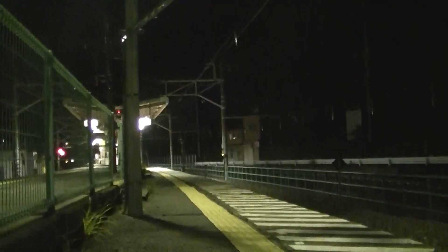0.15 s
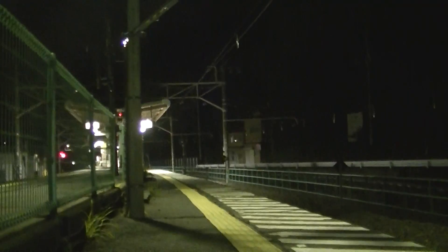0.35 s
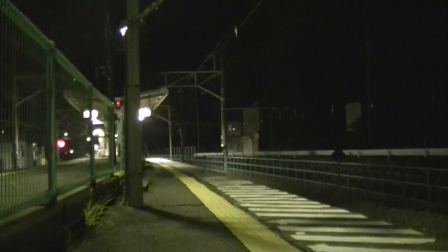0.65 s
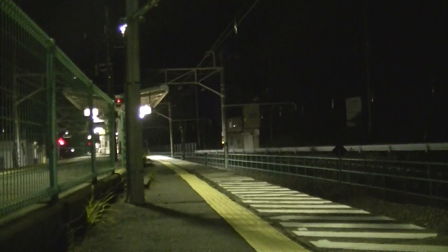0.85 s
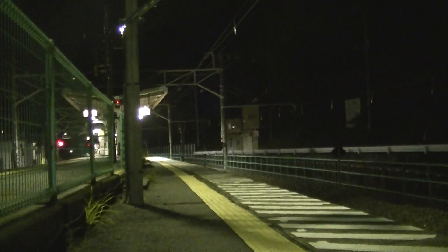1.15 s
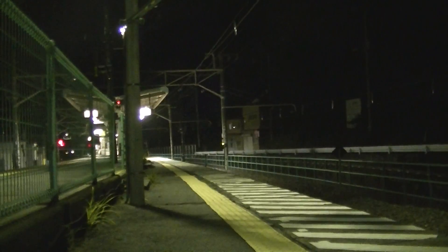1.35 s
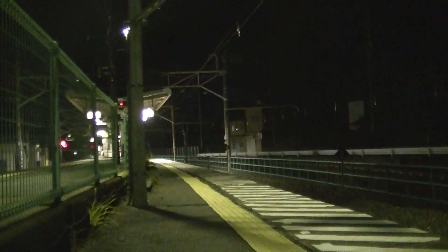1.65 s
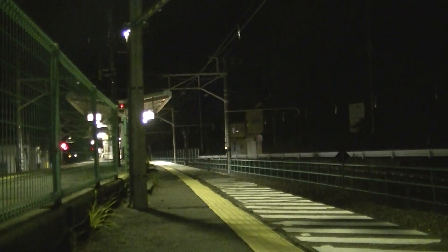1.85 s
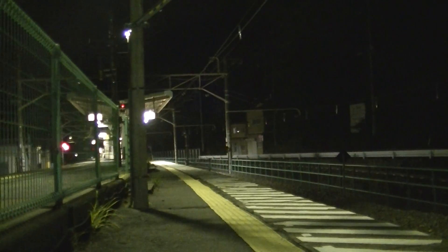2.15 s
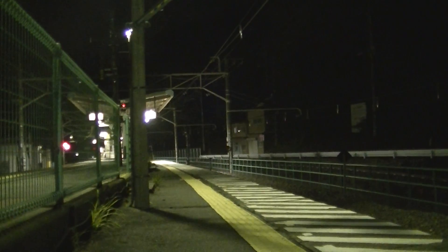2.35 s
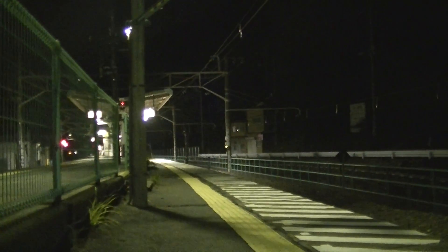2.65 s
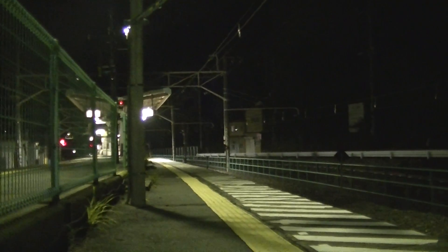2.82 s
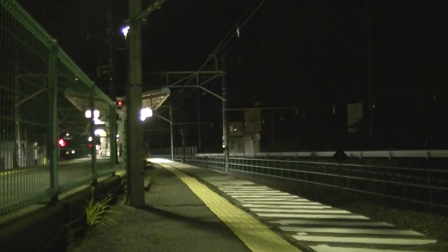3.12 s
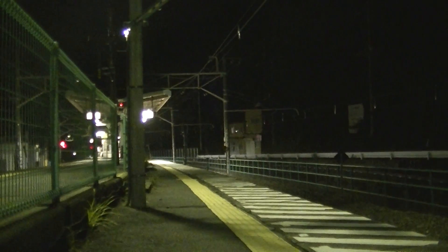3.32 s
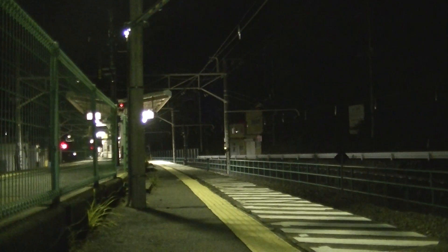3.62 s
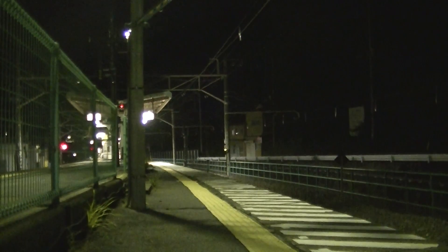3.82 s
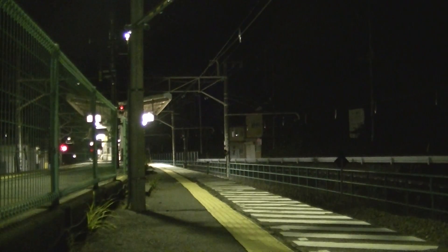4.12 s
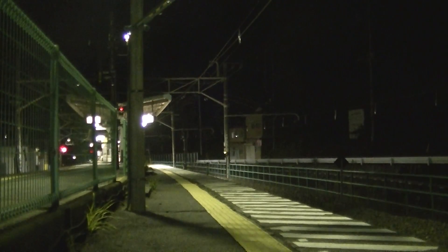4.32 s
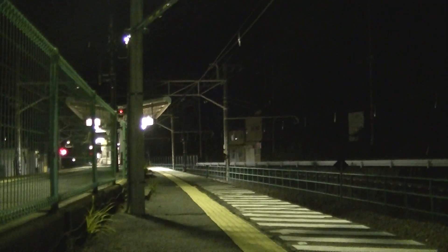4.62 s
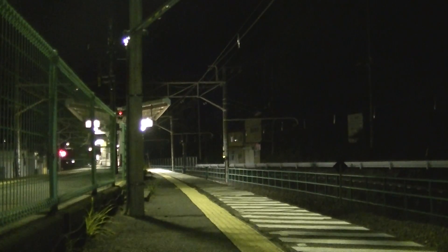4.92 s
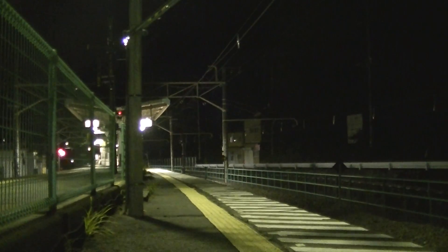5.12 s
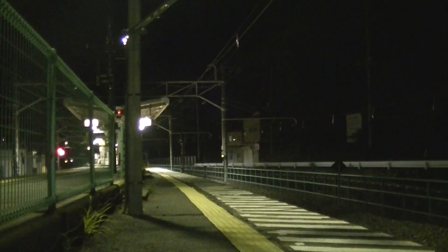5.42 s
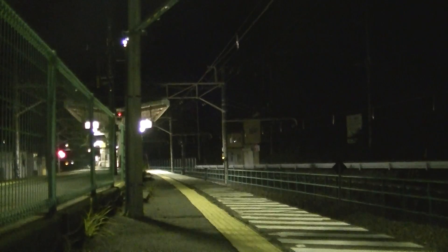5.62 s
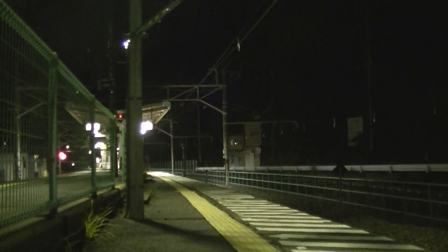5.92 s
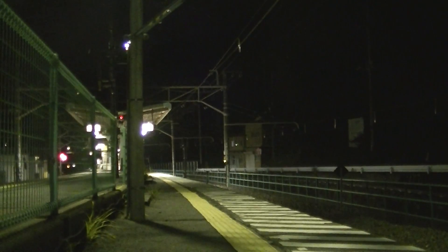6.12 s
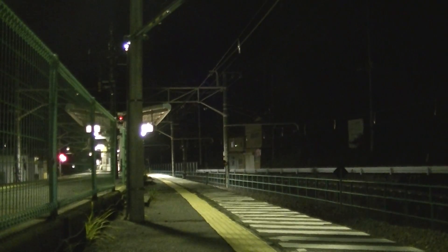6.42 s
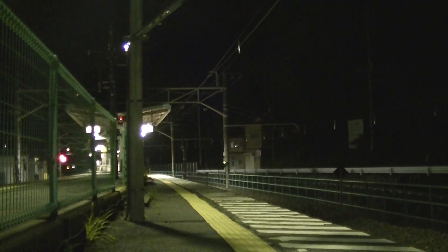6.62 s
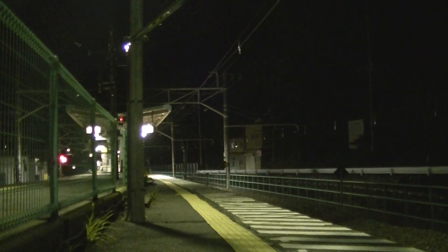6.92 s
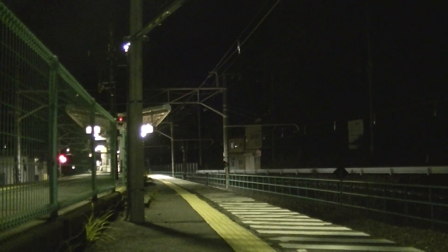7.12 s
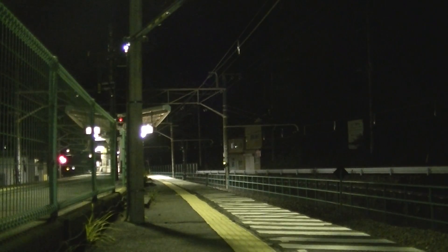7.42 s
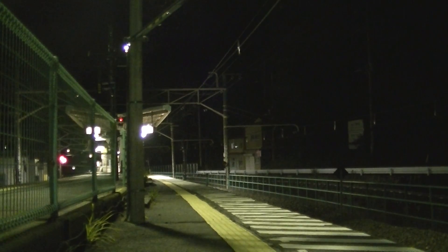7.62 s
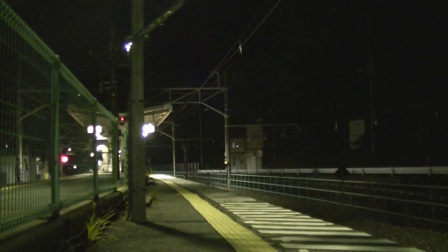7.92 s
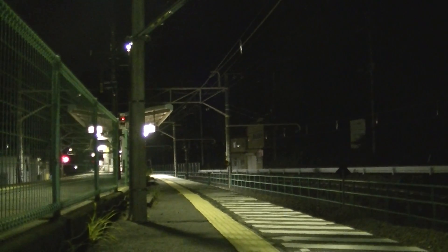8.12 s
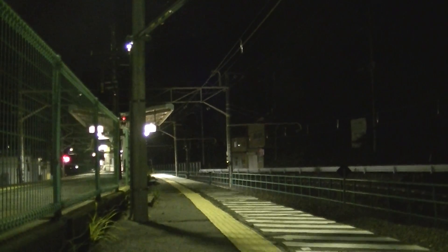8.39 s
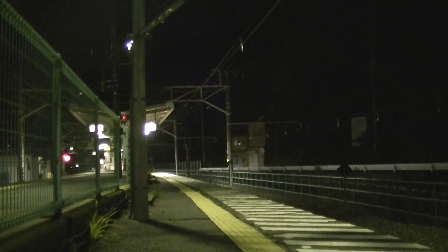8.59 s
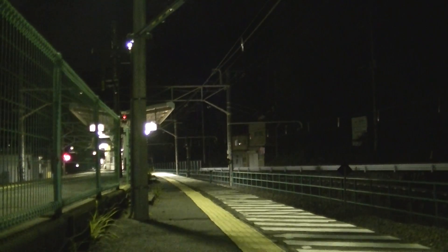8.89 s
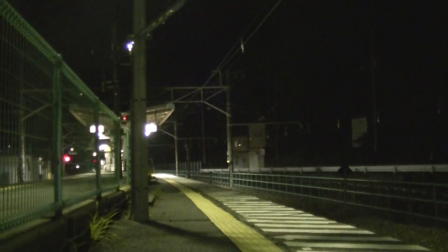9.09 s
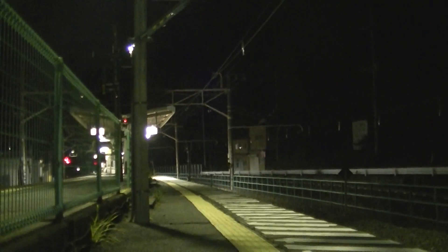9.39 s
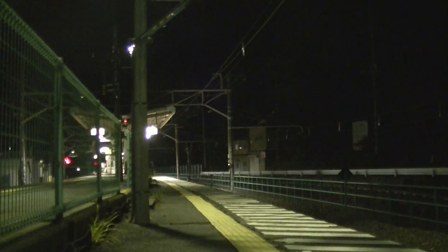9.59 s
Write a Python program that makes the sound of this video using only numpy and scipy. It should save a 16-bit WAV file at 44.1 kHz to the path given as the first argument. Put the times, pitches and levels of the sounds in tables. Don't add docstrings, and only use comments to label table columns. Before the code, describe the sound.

Several crickets trill in fast, bright, high-pitched pulsing chirps at night, layered over a thin insect hiss and faint low distant road rumble.

```python
import sys
import numpy as np
from scipy import signal
from scipy.fft import rfft, irfft
from scipy.io import wavfile

SR = 44100
rng = np.random.default_rng(int(sys.argv[2]) if len(sys.argv) > 2 else 0)


def magnitude_from_level(level_db):
    exponent = np.asarray(level_db, float) / 20
    return 10 ** exponent


def generate_wav(sig):
    pcm = np.round(np.clip(np.atleast_2d(sig).T, -1, 1) * 32767).astype(np.int16)
    wavfile.write(sys.argv[1], SR, pcm)


N = 429975

# (frequency [Hz], density [dB per Hz])
HISS_COLOUR = [(2000, -30), (2600, -15.5), (4300, 0.5), (6300, -3.5), (7200, -8.5), (9000, -10),
               (12000, -11), (14000, -12), (15500, -10.5), (17000, -21.5)]
# (frequency [Hz], side minus mid [dB])
STEREO_WIDTH = [(60, -14), (110, -15), (200, -19.5), (380, -19.5), (700, -16), (1290, -10.5), (2380, -9.5),
                (4400, -14), (8120, -13.5), (15000, -14)]
# (frequency [Hz], left minus right [dB])
STEREO_LEAN = [(60, -0.5), (130, 1.6), (290, 1.5), (640, 2), (1410, 1.5), (3100, 1), (6820, -1),
               (15000, -0.5)]
# (time [s], level [dB])
TRAFFIC_SWELL = [(0.0, -43), (0.16, -41.5), (0.35, -47), (1.06, -44), (1.5, -48), (2.1, -43), (3.05, -49),
                 (3.26, -44), (3.7, -44.5), (4.75, -41), (4.97, -45), (5.4, -50), (6.6, -43), (7.2, -43.5),
                 (8.1, -48), (8.7, -44.5), (9.35, -44), (9.75, -45.5)]
# (frequency [Hz], density [dB per Hz])
RUMBLE_COLOUR = [(15, -43), (25, -8.5), (64, 0), (146, 0.5), (182, -2), (210, -3), (270, -28), (460, -120)]
DRONE_COLOUR = [(130, -44), (215, -7), (227, -4.5), (242, 1.5), (296, 0.5), (396, -4), (440, -12),
                (570, -52), (970, -120)]
WASH_COLOUR = [(260, -53), (440, -2), (610, -4.5), (746, -4), (1240, -14.5), (1470, -15.5), (2600, -20.5),
               (3380, -40), (5720, -120)]
# (frequency [Hz], density [dB per Hz])
MASS_HIGH_COLOUR = [(4200, -52), (4400, -35.5), (4750, -20), (4980, -25), (5080, -12.5), (5300, -10),
                    (5440, 0), (5600, -3.5), (5800, -11), (5920, -25.5), (6150, -55), (6500, -57)]
MASS_LOW_COLOUR = [(2600, -34), (2800, -9), (2960, -4), (3060, -2.5), (3200, -11.5), (3290, -8), (3400, -8),
                   (3600, -6), (3950, -10.5), (4150, -13), (4300, -31), (4500, -50)]
# (time [s], stroke rate [1/s], level [dB], upper wing band over lower [dB])
BUSH_BUZZ = [(0.0, 32.7, -67.5, -8), (0.45, 33.7, -67.5, -6), (2.68, 33.6, -68, -5.5),
             (3.09, 32.6, -67, -4), (3.33, 32.8, -71, -5), (4.7, 33.7, -69.5, -3), (5.29, 32.2, -75, 3),
             (5.96, 32.3, -81, 11), (7.3, 31.1, -77, 5)]
# (frequency [Hz], width [Hz], level [dB])
BUZZ_LOW_WING = [(9570, 2100, -1), (10180, 900, -2)]
BUZZ_HIGH_WING = [(11150, 230, -6), (10700, 1300, -8)]
SHRILL_WING = [(7998, 60, 0), (8320, 400, -5), (7900, 700, -7)]
# (wing [Hz], glide [Hz], stroke rate [1/s], chirp rate [1/s],
# share of time singing [0-1], level [dB], left minus right [dB])
FAR_SINGERS = [(5440, 50, 38.5, 3.6, .7, -51, -1), (5500, 50, 40.5, 3.1, .7, -52, 0),
               (5570, 50, 41.5, 3.8, .7, -51, 0), (5790, 50, 38.6, 3.5, .7, -57, -1),
               (5100, 80, 39.4, 3.2, .6, -61, 0), (3060, -40, 43.0, 10.8, .75, -58, 1.5),
               (3030, -40, 38.0, 9.5, .75, -59, 1.5), (3850, -500, 51.0, 4.1, .55, -67, -1),
               (3400, -20, 30.0, 1.7, .7, -68, 0)]
# (first stroke [s], level [dB])
SLOW_CALLS = [
    (3.204, -50),
    (8.66, -50),
]
# (time [s], triplet number [count])
TRIPLET_CLOCK = [(0.043, 0), (0.832, 8), (4.007, 40), (5.585, 56), (7.545, 76), (9.909, 100)]
# (first full stroke [s], chirp number [count])
SWEEPER_CLOCK = [(0.115, 0), (0.806, 3), (1.026, 4), (1.481, 6), (2.844, 12), (4.194, 18), (4.634, 20),
                 (5.542, 24), (7.347, 32), (8.256, 36), (8.946, 39), (9.612, 42)]
# (start [s], length [s], level [dB])
NEIGHBOUR_BOUTS = [(0.097, 0.17, -38), (0.398, 0.17, -43), (0.705, 0.16, -42.5), (1.02, .2, -43),
                   (1.323, 0.16, -39), (1.61, .23, -40), (2.195, 0.12, -38.5), (2.51, .17, -35.5),
                   (2.793, 0.28, -36.5), (3.19, 0.15, -42), (3.45, 0.45, -44), (3.863, .22, -40.5),
                   (4.166, 0.13, -41), (4.46, 0.23, -38.5), (4.69, 0.12, -38), (5.126, .3, -44.5),
                   (5.54, 0.18, -36), (5.84, 0.33, -42), (6.2, 0.33, -42), (6.498, 0.27, -43.5),
                   (6.79, .21, -45), (7.11, 0.21, -39.5), (7.35, 0.31, -40), (7.68, .2, -39.5),
                   (7.993, 0.17, -40), (8.27, 0.21, -39), (8.48, 0.17, -37), (8.69, .26, -40),
                   (9.075, 0.24, -40.5), (9.34, 0.28, -41)]
# (time [s], peak [dB], ring [Hz], cycles to the top [count])
HAND_TICKS = [(.0145, -35, 2400, 2.4), (0.013, -35, 3300, 2.6), (.0138, -40, 4500, 1.5),
              (1.48, -44, 2100, 1.6), (2.0435, -36, 2800, 1.2), (2.043, -36, 4200, 1.3)]
# (time [s], level [dB], length [s])
HAND_RUSTLES = [
    (0.402, -44, 0.032),
    (0.505, -43, 0.05),
    (5.576, -47, 0.034),
]
# (frequency [Hz], density [dB per Hz])
RUSTLE_COLOUR = [(200, -33), (350, 5), (700, -3), (1100, -18), (2200, -15), (4000, -38)]
# (first stroke [s], last stroke [s], peak [dB])
NEAR_CHIRPS = [(0.107, 0.313, -35.5), (0.407, 0.561, -33), (0.661, 0.84, -32.5), (0.957, 1.162, -34),
               (1.26, 1.414, -31.5), (1.535, 1.764, -32.5), (1.891, 2.068, -31.5), (2.187, 2.418, -33),
               (2.487, 2.664, -33.5), (2.78, 3.011, -32.5), (3.13, 3.309, -32), (3.429, 3.608, -33.5),
               (3.732, 3.911, -32.5), (4.031, 4.209, -32.5), (4.325, 4.505, -32.5), (4.62, 4.851, -33.5),
               (4.945, 5.124, -33.5), (5.248, 5.404, -32.5), (5.529, 5.681, -34), (5.796, 5.926, -31.5),
               (6.049, 6.254, -33), (6.376, 6.557, -34), (6.707, 6.861, -34), (6.959, 7.164, -36.5),
               (7.31, 7.44, -37), (7.564, 7.693, -38), (7.833, 8.116, -38), (9.037, 9.216, -37),
               (9.306, 9.437, -33.5), (9.554, 9.683, -36.5)]


def rms_one(x):
    return x / np.sqrt(np.mean(x ** 2) + 1e-20)


def in_time(rows):
    s, *columns = np.transpose(rows)
    return [np.interp(np.arange(N) / SR, s, column) for column in columns]


def at_hz(points, hz):
    point_hz, level_db = np.transpose(points)
    return np.interp(np.log(hz + 1), np.log(point_hz), level_db)


def drift(rate):
    r = np.exp(-80 * np.pi * rate / SR)
    slow = signal.lfilter([1], [1, -2 * r, r * r], rng.standard_normal(N // 40 + 2002))
    slow = slow[2000:]
    return np.interp(np.arange(N) / 40, np.arange(len(slow)), rms_one(slow))


def clock(marks):
    s, number = np.transpose(marks)
    return np.interp(np.arange(number[-1] + 1), number, s)


def place(x, lean_db, lag_samples=0.):
    late = x - lag_samples * np.gradient(x)
    return np.array([late * magnitude_from_level(lean_db / 2), x * magnitude_from_level(-lean_db / 2)])


def air_noise(colour):
    hz = np.fft.rfftfreq(N, 1 / SR)
    mid, side = rfft(rng.standard_normal((2, N))) * magnitude_from_level(at_hz(colour, hz))
    bass_width = (1 + (60 / (hz + 30)) ** 2) ** .5
    side = magnitude_from_level(at_hz(STEREO_WIDTH, hz)) * bass_width * side
    pair = mid + side * [[1], [-1]]
    return rms_one(irfft(pair * magnitude_from_level(at_hz(STEREO_LEAN, hz) / 2 * [[1], [-1]]), N))


def resonate(peaks, side_db=-12):
    out = 0
    for hz, width_hz, level_db in peaks:
        r = np.exp(-np.pi * width_hz / SR)
        a = [1, -2 * r * np.cos(2 * np.pi * hz / SR), r * r]
        b = (1 - r * r) / 2 * np.array([1, 0, -1])
        once = signal.lfilter(b, a, rng.standard_normal((2, N)))
        out = out + magnitude_from_level(level_db) * signal.lfilter(b, a, once)
    return rms_one(out[0] + magnitude_from_level(side_db) * out[1] * [[1], [-1]])


def throb(per_s, depth, sharp):
    cycle = np.cumsum(per_s + np.zeros(N)) / SR
    return rms_one(1 - depth + depth * np.cos(np.pi * cycle) ** (2 * sharp))


def strokes(at_s, level_db, hz, glide_hz, length_s, peak=.5, blunt=2, uneven_db=1.0, jitter_s=.0005):
    detune, phase, uneven, jitter = rng.standard_normal((4, len(at_s)))
    length = int(length_s * SR)
    u = np.arange(length) / length
    shape = np.sin(np.pi * u ** (np.log(.5) / np.log(peak))) ** blunt
    pitch_hz = (hz * (1 + .0015 * detune))[:, None] + glide_hz * (u - peak)
    tone = shape * np.sin(2 * np.pi * np.cumsum(pitch_hz, axis=1) / SR + 10 * phase[:, None])
    gain = magnitude_from_level(level_db + uneven_db * uneven)
    start = ((at_s + jitter_s * jitter - peak * length_s) * SR).astype(int)
    out = np.zeros(N + 2 * SR)
    index = np.clip(start[:, None] + np.arange(length) + SR, 0, len(out) - 1)
    np.add.at(out, index, gain[:, None] * tone)
    return out[SR:SR + N]


def hiss():
    return magnitude_from_level(-61) * air_noise(HISS_COLOUR)


def traffic():
    drone_db, = in_time(TRAFFIC_SWELL)
    swell_db = drone_db - drone_db.mean()
    recede_s = 1.74
    near = np.exp(-np.arange(N) / SR / recede_s)
    rumble_db = -49.5 + 6.0 * near + .1 * swell_db + 0.79 * drift(2.9)
    wash_db = -50 + 4.5 * near + 0.067 * swell_db + 0.55 * drift(2.2)
    drone_db = drone_db + 0.35 + 0.91 * drift(2.6)
    rumble = magnitude_from_level(rumble_db) * air_noise(RUMBLE_COLOUR)
    drone = magnitude_from_level(drone_db) * air_noise(DRONE_COLOUR)
    wash = magnitude_from_level(wash_db) * air_noise(WASH_COLOUR)
    return rumble + drone + wash


def massed_chorus():
    return magnitude_from_level(-45.5) * air_noise(MASS_HIGH_COLOUR) + magnitude_from_level(-56.5) * air_noise(MASS_LOW_COLOUR)


def bush_crickets():
    per_s, low_db, upper_db = in_time(BUSH_BUZZ)
    singing = np.arange(N) < (BUSH_BUZZ[-1][0] - .04) * SR
    buzz = magnitude_from_level(low_db) * resonate(BUZZ_LOW_WING) + magnitude_from_level(low_db + upper_db) * resonate(BUZZ_HIGH_WING)
    buzz = buzz * throb(per_s, depth=0.45, sharp=2) * singing
    shrill = magnitude_from_level(-68) * resonate(SHRILL_WING) * throb(18.1, depth=0.19, sharp=3)
    lean = magnitude_from_level(-.3 * np.array([[1], [-1]]))
    return lean * (buzz + shrill)


def chorus():
    out = 0
    for hz, glide_hz, per_s, chirps_per_s, singing, level_db, lean_db in FAR_SINGERS:
        at = np.cumsum((1 + .04 * rng.standard_normal(600)) / per_s) - .1
        chirp_clock = at * chirps_per_s + np.cumsum(.03 * rng.standard_normal(600)) + rng.random()
        stroke_db = level_db - 40 * (chirp_clock % 1 > singing)
        song = strokes(at, stroke_db, hz + 0 * at, glide_hz, length_s=.7 / per_s, uneven_db=4.0)
        out = out + place(song, lean_db)
    return out


def slow_singer(spacing_s=.064):
    first, level_db = np.transpose(SLOW_CALLS)[:, :, None]
    k = np.arange(4)
    at = (first + k * spacing_s).ravel()
    level_db = (level_db - 4.0 * (k == 0)).ravel()
    song = strokes(at, level_db, 3930 + 0 * at, glide_hz=-560, length_s=.042, peak=.4, blunt=1)
    return place(song, -.5)


def triplets(spacing_s=.0246):
    at = (clock(TRIPLET_CLOCK)[:, None] + np.arange(3) * spacing_s).ravel()
    sample = np.minimum(at * SR, N - 1).astype(int)
    level_db = -47.5 + 1.5 * drift(0.73)[sample]
    main = strokes(at, level_db + 1, 2965 + 0 * at, glide_hz=-60, length_s=.012, uneven_db=1.5)
    lead = strokes(at - .008, level_db - 6.0, 3050 + 0 * at, glide_hz=-74, length_s=.011, uneven_db=1.5)
    return place(main + lead, 1.7, lag_samples=-.18)


def sweeper(spacing_s=.0191):
    k = np.arange(-1, 6)
    first = clock(SWEEPER_CLOCK)[:, None]
    chirp_db = -47 + 0.09 * first + 0.8 * rng.standard_normal(first.shape)
    at = first + k * spacing_s + 0.0047
    faint = np.where(k < 0, 1., 0.) + 0 * first
    level_db = chirp_db + .3 - 6.0 * faint - 2.0 * (k == 0)
    hz = 3790 - 60 * faint
    song = strokes(at.ravel(), level_db.ravel(), hz.ravel(), glide_hz=-860, length_s=.021,
                   peak=.52, blunt=1.1, uneven_db=1.3, jitter_s=.0004)
    echo = .42 * np.roll(song, round(.00278 * SR))
    return place(song + echo, -1.1, lag_samples=.45)


def neighbour(edge_s=0.057, rest_db=-49):
    at = np.cumsum(1 / 38.7 + .0008 * rng.standard_normal(400))
    start, length_s, bout_db = np.transpose(NEIGHBOUR_BOUTS)[:, :, None]
    inside_s = np.minimum(at - start, start + length_s - at)
    open_wings = np.clip(inside_s / edge_s + .5, 0, 1)
    level_db = rest_db + np.max(open_wings * (bout_db - rest_db), axis=0) + 0.9
    song = strokes(at, level_db, 5610 + 0 * at, glide_hz=49.7, length_s=.021, uneven_db=2.0)
    return place(song, -.5, lag_samples=0.19)


def rustles():
    t = np.arange(N) / SR
    puffs = sum(magnitude_from_level(db) * np.exp(-((t - s) / length_s * 2) ** 2) for s, db, length_s in HAND_RUSTLES)
    return puffs * air_noise(RUSTLE_COLOUR)


def ticks():
    out = np.zeros(N)
    for s, level_db, hz, cycles in HAND_TICKS:
        turns = np.clip((np.arange(N) / SR - s) * hz / cycles + 1, 0, 40)
        swell = turns * np.exp(1 - turns)
        out += magnitude_from_level(level_db) * swell * np.sin(2 * np.pi * cycles * turns)
    return out


def near_cricket(spacing_s=.0256):
    rows = []
    for first, last, db in NEAR_CHIRPS:
        for k in range(round((last - first) / spacing_s) + 1):
            rows.append((first + k * spacing_s, k, db))
    at, k, level_db = np.transpose(rows)
    cold = np.exp(-k / 1.3)
    level_db = level_db + 1.1 - 4.5 * cold ** 2
    song = strokes(at, level_db, 5465 - 75 * cold, glide_hz=50, length_s=.019)
    return place(song, -1.2, lag_samples=0.35)


def scatter(x, t60_s=.14):
    t = np.arange(int(.3 * SR)) / SR
    shared, own = rng.standard_normal((2, len(t))) * magnitude_from_level(-60 * t / t60_s) * (t > .004)
    tail = np.array([shared + .45 * own, shared - .45 * own]) / np.sqrt(np.sum(shared ** 2))
    return magnitude_from_level(-15) * signal.fftconvolve(x, tail, axes=1)[:, :N]


def scene():
    background = hiss() + traffic() + massed_chorus()
    far_insects = bush_crickets() + chorus() + slow_singer()
    insects = far_insects + triplets() + sweeper() + neighbour() + near_cricket()
    return background + insects + scatter(insects) + rustles() + ticks()


def band_limit(x):
    return signal.sosfilt(signal.butter(12, 16970, fs=SR, output="sos"), x)


def record(dry):
    low_cut = signal.butter(4, 36, "high", fs=SR, output="sos")
    top_cut = signal.ellip(12, .3, 70, 15740, fs=SR, output="sos")
    mix = signal.sosfilt(top_cut, signal.sosfilt(low_cut, dry))
    return band_limit(mix)


dry = scene()
out = record(dry)
generate_wav(out)
```